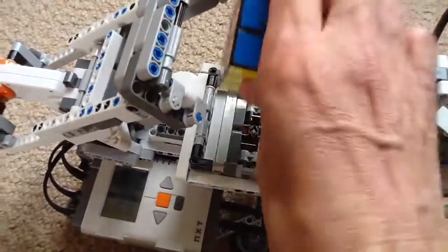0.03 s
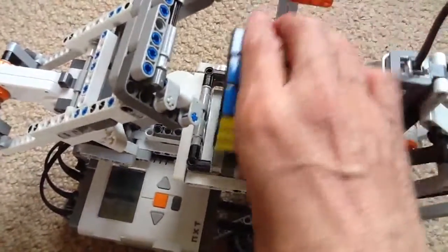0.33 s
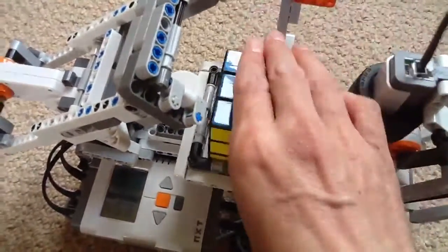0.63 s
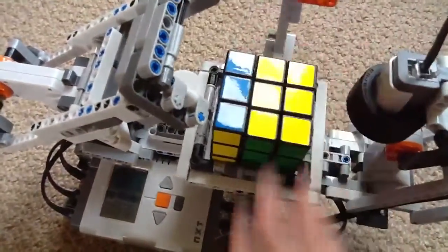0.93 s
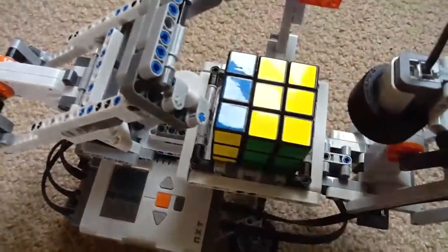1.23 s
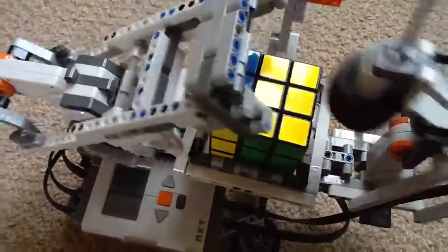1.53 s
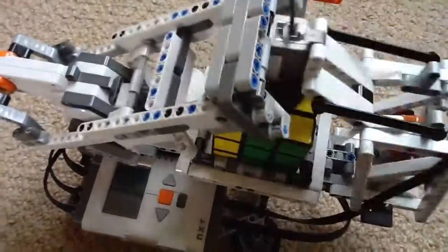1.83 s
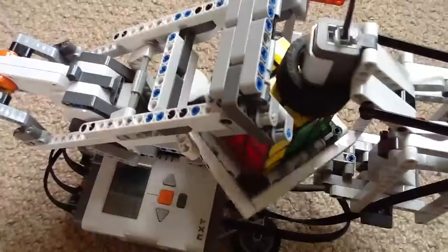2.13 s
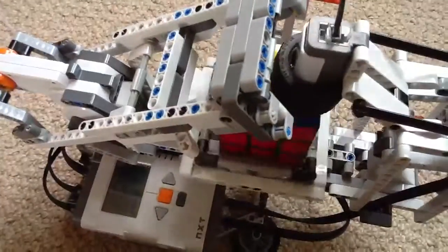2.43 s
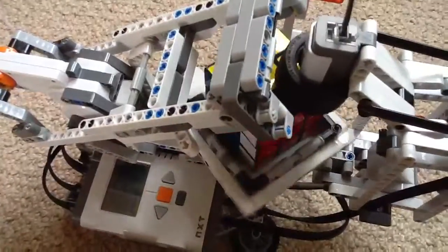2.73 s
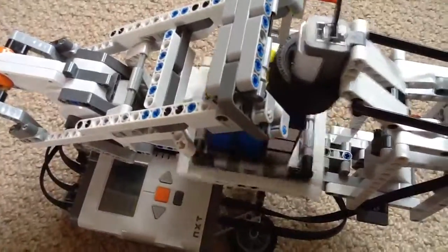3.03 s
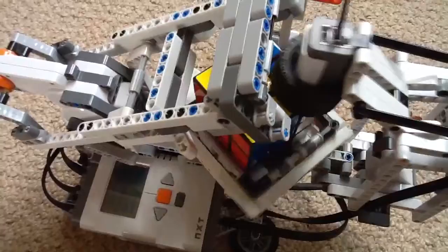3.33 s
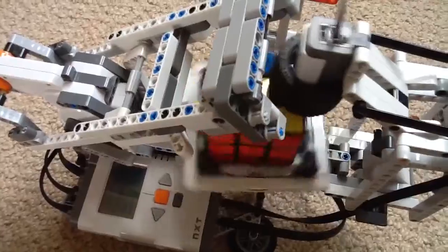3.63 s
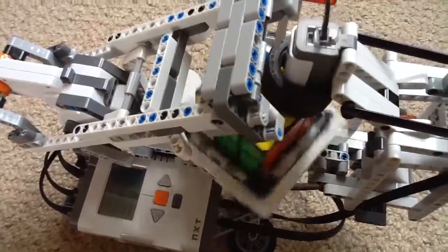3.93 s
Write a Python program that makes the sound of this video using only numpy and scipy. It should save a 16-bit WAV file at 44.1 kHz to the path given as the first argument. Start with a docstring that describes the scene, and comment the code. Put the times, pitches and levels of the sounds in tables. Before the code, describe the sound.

Small robot motors and plastic gears whir and chatter, close by in a carpeted room with a faint hum. From 0.3 to 0.8 seconds a puzzle cube clatters into the tray. After a faint tap at 1.2, the arms move three times with rising, rattling whines until 2.1. Then the tray turns in seven quick, quieter bursts of gear chatter with clicks and clacks, until about 4 seconds.

```python
"""A plastic puzzle cube clatters as a hand sets it into the tray of a small toy-brick robot.
The robot twitches with a faint, dull tap, then geared motors swing its arms in three moves, whining
upward and rattling in the frame. The tray turns in seven quick steps: the slack snaps up, the motor
races, the gears chatter, and it brakes. One microphone, close by, in a carpeted room with a faint hum."""
import sys
import numpy as np
from scipy import signal
from scipy.fft import rfft, irfft
from scipy.io import wavfile
from scipy.ndimage import uniform_filter1d

SR = 44100
rng = np.random.default_rng(int(sys.argv[2]) if len(sys.argv) > 2 else 0)


def master(y):
    """Save y as 16-bit WAV."""
    cut = np.clip(np.atleast_2d(y).T, -1, 1)
    pcm = np.round(cut * 32767)  # scale
    wavfile.write(sys.argv[1], SR, pcm.astype(np.int16))


N = 176400
TIME = np.arange(N) / SR


def from_db(db):
    """Decibels to gain."""
    return 10 ** (np.asarray(db) / 20)


def rms_one(x):
    """Scale to unit rms."""
    return x / np.sqrt(np.mean(x ** 2) + 1e-20)


def in_time(rows):
    """Read a curve of (time_s, value) rows at every sample."""
    return np.interp(TIME, *np.transpose(rows))


def at_hz(spectrum, hz):
    """Read a spectrum in dB on a log-frequency axis."""
    freq_hz, db = np.transpose(spectrum)
    return np.interp(np.log(np.maximum(hz, 1)), np.log(freq_hz), db)


def swell(offset_s, width_s):
    """A bell curve, 1 at zero offset."""
    return np.exp(-.5 * (offset_s / width_s) ** 2)


def drift(rate_hz):
    """Smooth random wander with spread 1."""
    hop, settle = 40, 2000
    pole = np.exp(-2 * np.pi * hop * rate_hz / SR)
    slow = signal.lfilter([1], [1, -2 * pole, pole * pole], rng.standard_normal(N // hop + settle + 2))
    slow = rms_one(slow[settle:])
    return np.interp(np.arange(N) / hop, np.arange(len(slow)), slow)


def coloured(x, spectrum):
    """Minimum-phase filter of unit power gain, shaped like the spectrum."""
    size = 8192
    gain = from_db(at_hz(spectrum, np.fft.rfftfreq(size, 1 / SR)))
    cepstrum = irfft(np.log(gain))
    cepstrum[1:size // 2] *= 2
    cepstrum[size // 2 + 1:] = 0
    response = irfft(np.exp(rfft(cepstrum)))
    return signal.fftconvolve(x, response / np.linalg.norm(response))[:N]


def dying(power, decay_s):
    """Spread each burst of energy over an exponential decay."""
    keep = np.exp(-1 / (decay_s * SR))
    return signal.lfilter([1 - keep], [1, -keep], power)


def room_tone(air_db=-64, hum_hz=121):
    """Faint room air and a low hum."""
    # colour of the air: freq_hz, gain_db
    air_spectrum = [(25, -50), (62, -38), (90, -18.5), (220, -15), (350, -22), (800, -26), (3000, -32),
                    (15500, -34)]
    # loudness of the hum: time_s, level_db
    hum_level = [(0, -75), (.12, -66.5), (1.2, -69.5), (1.4, -73.5), (4, -77.5)]
    hum = np.sqrt(2) * np.sin(2 * np.pi * np.cumsum(hum_hz + .5 * drift(2.7)) / SR)
    air = coloured(rng.standard_normal(N), air_spectrum)
    return from_db(air_db) * air + from_db(in_time(hum_level)) * hum


def carpeted_room(x, t60_s=0.17, tail_db=-10):
    """The direct sound plus the room's dense, quickly dying tail."""
    age = TIME[:SR // 2]
    tail = rng.standard_normal(len(age)) * from_db(-60 * age / t60_s)
    return x + from_db(tail_db) * signal.fftconvolve(x, tail / np.linalg.norm(tail))[:N]


def resonance(x, hz, width_hz):
    """One narrow mode with gain 1 at its peak."""
    return signal.lfilter(*signal.iirpeak(hz, hz / width_hz, fs=SR), x)


def contact(start_s, level_db, decay_s, ring_db, ring_t60_s=0.099):
    """A brief gritty touch of hard plastic and the dying buzz of the loose parts."""
    age = np.abs(TIME - start_s)
    envelope = np.exp(-age / decay_s) + from_db(ring_db - 60 * age / ring_t60_s)
    return from_db(level_db - 12) * rng.standard_normal(N) * (TIME >= start_s) * envelope


def through_bricks(x):
    """Short paths through the bricks, each an all-pass, smear a click."""
    # travel time of each path: delay_s
    paths = [.00017, .00029, .00043, .00071]
    for delay_s in paths:
        impulse = np.eye(1, int(delay_s * SR) + 1)[0]
        delayed = impulse[::-1]
        x = signal.lfilter(delayed - .5 * impulse, impulse - .5 * delayed, x)
    return x


def teeth(rate_hz, body, jitter, uneven_db, scrape_s, ring_db, click_db, ring_s=0.0049):
    """Each tooth clicks with its own strength, scrapes and sets loose bricks buzzing; steady level."""
    teeth_passed = np.cumsum(rate_hz * (1 + jitter * drift(200))) / SR
    strikes = np.diff(np.floor(teeth_passed), prepend=0).clip(0)
    strikes *= from_db(uneven_db * np.clip(rng.standard_normal(N), -2.3, 2.3))
    scrape_power = dying(strikes ** 2, scrape_s)
    buzz_power = from_db(ring_db) ** 2 * dying(strikes ** 2, ring_s)
    grit = np.sqrt(scrape_power + buzz_power + 1e-9) * rng.standard_normal(N)
    force = grit + from_db(click_db) * through_bricks(strikes)
    running_rms = np.sqrt(uniform_filter1d(force ** 2, size=1300) + 1e-12)
    return coloured(force / running_rms, body)


def whine(rate_hz, body, wobble, flutter_db, harmonics):
    """Multiples of the tooth rate glide through the frame's resonances; steady level."""
    phase = 2 * np.pi * np.cumsum(rate_hz * (1 + wobble * drift(67.1))) / SR
    tone, power = 0, 0
    for k in range(1, harmonics + 1):
        gain = from_db(at_hz(body, k * rate_hz) + flutter_db * drift(24.4))
        tone += gain * np.sin(k * phase + rng.uniform(0, 2 * np.pi))
        power += gain ** 2 / 2
    return tone / np.sqrt(power)


def frame_thuds(band_hz=(550, 1500)):
    """The whole frame knocks dully when the tray jerks hard."""
    # jerks of the tray: start_s, level_db
    jerks = [(3.058, -22.5), (3.371, -34)]
    knocks = sum(contact(s, db, decay_s=0.0072, ring_db=-9) for s, db in jerks)
    return signal.sosfilt(signal.butter(2, band_hz, "band", fs=SR, output="sos"), knocks)


def cube_and_twitch():
    """The cube lands and rings the tray, its pieces tick as the fingers let go, the robot twitches."""
    # taps, each with its own loudness and brightness: start_s, level_db, cutoff_hz
    # the last, a faint dull tap, is the robot's first twitch before the arms move
    touches = [(0.294, -37.5, 2500), (0.301, -31.5, 2200), (0.332, -32, 6950), (0.34, -37.5, 8000),
               (.412, -18, 8150), (0.447, -18, 6270), (0.4555, -26, 4000), (0.577, -40, 2000),
               (.589, -24.5, 3700), (1.192, -40.5, 1490)]
    # ticks of the loose pieces: start_s, level_db
    piece_ticks = [(0.668, -38), (.740, -36.5), (0.832, -40)]
    # modes of the tray under the cube, colour of the taps and of the ticks: freq_hz, gain_db
    modes = [(930, 3), (2100, 3), (3300, 4), (4300, 2), (5100, 3), (7700, 1)]
    tap_spectrum = [(100, -35), (220, -15), (550, -10.5), (900, -5), (2100, -0.5), (2700, -4), (7500, -1),
                    (9500, -5), (15500, -9.5)]
    tick_spectrum = [(1000, -25), (3300, -14), (4300, -2), (5800, -14), (8000, -8), (10000, -19),
                     (15000, -21)]
    taps = np.zeros(N)
    for start_s, db, cutoff_hz in touches:
        softness = np.exp(-2 * np.pi * cutoff_hz / SR)
        touch = contact(start_s, db, decay_s=0.0025, ring_db=-16.5)
        taps += signal.lfilter([np.sqrt(1 - softness ** 2)], [1, -softness], touch)
    rings = sum(from_db(db) * resonance(taps, hz, width_hz=160) for hz, db in modes)
    ticks = sum(contact(s, db, decay_s=0.0017, ring_db=-11) for s, db in piece_ticks)
    return from_db(-3) * coloured(taps + rings, tap_spectrum) + coloured(ticks, tick_spectrum)


def arm_frame(x):
    """The sound plus the ring of the arm's frame."""
    # modes of the frame: freq_hz, gain_db
    modes = [(4180, 4), (4550, 4), (4880, 3), (6850, -3)]
    return x + sum(from_db(db) * resonance(x, hz, width_hz=130) for hz, db in modes)


def arm_gears(last_move_s=1.835, groan_s=1.475, groan_hz=245):
    """The arm drive whines while it pulls evenly; running free, its teeth lose time and rattle."""
    # tooth rate through the three moves: time_s, rate_hz
    tooth_rate = [(1.27, 130.6), (1.30, 379.4), (1.335, 630), (1.355, 595), (1.38, 277.8), (1.40, 380.1),
                  (1.43, 259.2), (1.46, 490.5), (1.52, 605), (1.56, 648.2), (1.60, 667), (1.69, 819.5),
                  (1.76, 923), (1.80, 704.2), (1.84, 282.7), (1.885, 590), (1.95, 756.7), (1.985, 788),
                  (2.01, 654.3), (2.13, 197.3)]
    # loudness of the gears, and the clean whine's share of it: time_s, level_db
    loudness = [(1.18, -94), (1.2, -61.5), (1.272, -59), (1.283, -42), (1.30, -31), (1.34, -25),
                (1.378, -43.5), (1.398, -31), (1.426, -50), (1.465, -33.5), (1.532, -27.5), (1.56, -31),
                (1.582, -26), (1.612, -27.5), (1.71, -23.5), (1.728, -29), (1.742, -24.5), (1.79, -25),
                (1.825, -47.5), (1.862, -39.5), (1.87, -32.5), (1.90, -29), (1.984, -27.5), (2.014, -32.5),
                (2.06, -34), (2.125, -46.5), (2.2, -64)]
    whine_share = [(1.40, -20), (1.47, -5), (1.59, -3), (1.64, -14), (1.70, -8.5), (1.81, -16), (1.88, -6),
                   (1.975, -5.5), (2.02, -20)]
    # colour of the rattle, of the first two moves' whine and of the last move's: freq_hz, gain_db
    body = [(180, -46), (450, -37.5), (800, -22), (1200, -21.5), (1900, -14.5), (2400, -8), (3600, -10.5),
            (4500, -6), (7500, -5.5), (10000, -6), (12500, -11), (15500, -23.5)]
    early_spectrum = [(650, -27), (1020, -15), (1330, -17), (1650, -15), (2000, -10), (2450, -2),
                      (3100, -14), (4000, -9), (4700, 4), (5400, -3), (9000, -10)]
    last_spectrum = [(450, -26), (720, -10), (1250, -12), (1600, -16), (2300, -3), (2950, 0), (3700, -6),
                     (5150, 5), (9000, -5)]
    # the gears take up their slack: start_s, level_db
    slack_snaps = [(1.283, -19), (1.394, -24), (1.867, -16)]
    rate_hz = in_time(tooth_rate)
    clean = np.clip(from_db(in_time(whine_share)), .05, .9)
    rattle = teeth(rate_hz, body, jitter=0.017 / clean, uneven_db=4.5,
                   scrape_s=0.00026, ring_db=5, click_db=-5.5)
    early = whine(rate_hz, early_spectrum, wobble=0.004 / clean, flutter_db=4.5, harmonics=12)
    last = whine(rate_hz, last_spectrum, wobble=0.004 / clean, flutter_db=5.5, harmonics=12)
    tone = np.where(TIME < last_move_s, early, last)
    gears = from_db(-2) * np.sqrt(1 - clean ** 2) * rms_one(arm_frame(rattle)) + clean * tone
    snaps = sum(contact(s, db, decay_s=0.00076, ring_db=-30) for s, db in slack_snaps)
    # the arm groans as it takes the load
    groan = from_db(-58) * swell(TIME - groan_s, width_s=0.02) * np.sin(2 * np.pi * groan_hz * TIME)
    return from_db(in_time(loudness)) * gears + arm_frame(coloured(snaps, body)) + groan


def tray_gears(cruise_hz=478.5, run_up_s=0.03, race_at_s=0.053, brake_s=0.075):
    """Each step: the slack snaps up, the motor overshoots, cruises, grabs and slows to a stop."""
    # steps of the tray: start_s, length_s, snap_db, racing_db, top_rate_hz
    steps = [(2.142, 0.29, -39, -42, 561.7), (2.432, 0.27, -25, -42.5, 547.3),
             (2.721, 0.28, -24, -43.5, 538.8), (3.018, 0.29, -18, -38, 578.3),
             (3.321, .235, -22, -42.5, 557.8), (3.57, 0.26, -27, -42, 570.7), (3.842, 0.28, -40, -43, 594)]
    # loose parts clack as it turns: start_s, level_db
    clacks = [(2.32, -15.5), (2.901, -19.5), (3.713, -18.5), (3.958, -20)]
    # colour of the tray's gears and of the racing motor's whine: freq_hz, gain_db
    body = [(150, -55), (450, -37), (850, -32.5), (1300, -21), (1900, -15), (2650, -6), (3400, -6.5),
            (4450, -0.5), (6700, -3), (7300, 1.5), (8000, -4.5), (11000, -8.5), (13000, -14.5),
            (15500, -21.5)]
    whine_spectrum = [(600, -40), (1650, -16), (2250, -6), (2800, 5), (3400, -9)]
    # the frame shaken by the racing motor, and rattling on between steps: freq_hz, gain_db
    shudder_spectrum = [(60, -32), (300, -16), (750, -10), (1600, -5), (2650, 7), (3300, -23), (6000, -5)]
    drone_spectrum = [(60, -34), (160, -10), (250, -2.5), (400, -16), (950, 0.5), (1300, -7), (2600, 1.5),
                      (5000, -15.5)]
    level, racing, snaps = np.zeros((3, N))
    rate_hz = np.full(N, 100.)
    for start_s, length_s, snap_db, racing_db, top_rate_hz in steps:
        age = TIME - start_s
        left_s = length_s - age
        turning = (age >= 0) & (age < length_s + .03)
        starting = np.clip(1 - age / run_up_s, 0, 1)
        braking = np.clip(1 - left_s / brake_s, 0, 1)
        race = swell(age - race_at_s, width_s=0.011)
        grab = swell(left_s - 0.08, width_s=0.042)  # the teeth load up as braking begins
        step_db = -8.5 * starting - 14 * braking + 2 * race + 2 * grab
        level = np.maximum(level, turning * from_db(step_db))
        driven_hz = cruise_hz * (1 - .5 * starting) * (1 - .6 * braking)
        overshoot_hz = top_rate_hz * swell(age - race_at_s, width_s=0.05)
        rate_hz = np.maximum(rate_hz, turning * np.maximum(driven_hz, overshoot_hz))
        racing += turning * race * from_db(racing_db)
        snaps += contact(start_s, snap_db, decay_s=0.00049, ring_db=-17)
    snaps += sum(contact(s, db, decay_s=0.00098, ring_db=-5.5) for s, db in clacks)
    chatter = teeth(rate_hz, body, jitter=0.2, uneven_db=4, scrape_s=0.00031, ring_db=1.5, click_db=-6.5)
    shudder = teeth(rate_hz, shudder_spectrum, jitter=0.14, uneven_db=-4,
                    scrape_s=0.00027, ring_db=22, click_db=-16)
    drone_gain = from_db(-56.5) * np.sqrt(dying(level, decay_s=0.12))
    drone = drone_gain * coloured(rng.standard_normal(N), drone_spectrum)
    flutter = 1 + 0.6 * drift(200)
    squeak = flutter * whine(rate_hz, whine_spectrum, wobble=0.0246, flutter_db=2, harmonics=6)
    motor = squeak + from_db(2) * shudder
    chatter_gain = from_db(-38 + drift(26)) * level
    return chatter_gain * chatter + racing * motor + drone + coloured(snaps, body)


def scene():
    """Cube and gears close to one microphone, in a dead room."""
    robot = cube_and_twitch() + arm_gears() + tray_gears() + frame_thuds()
    return (carpeted_room(robot) + room_tone())[None]


def record(dry, cutoff_hz=15700):
    """The top is cut steeply."""
    return signal.sosfilt(signal.ellip(12, .1, 80, cutoff_hz, fs=SR, output="sos"), dry)


dry = scene()
out = record(dry)
master(out)
```